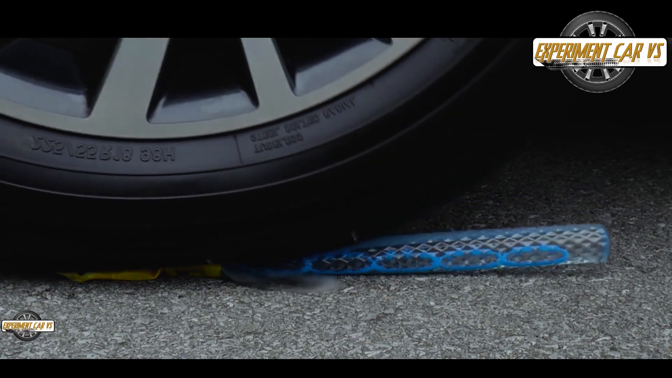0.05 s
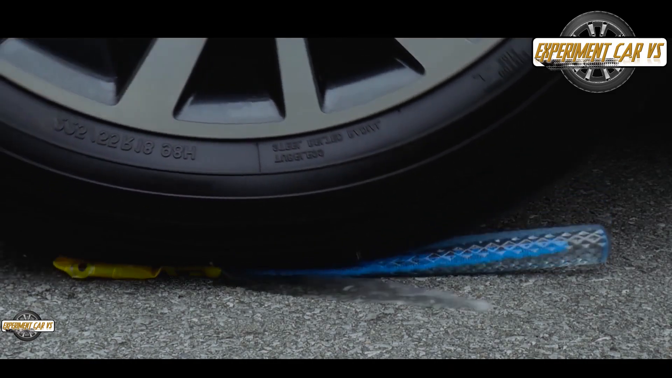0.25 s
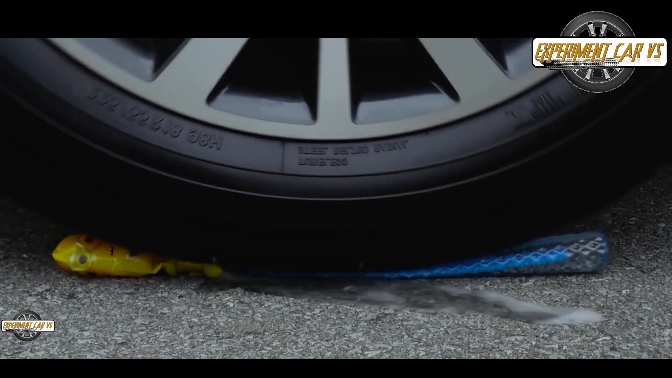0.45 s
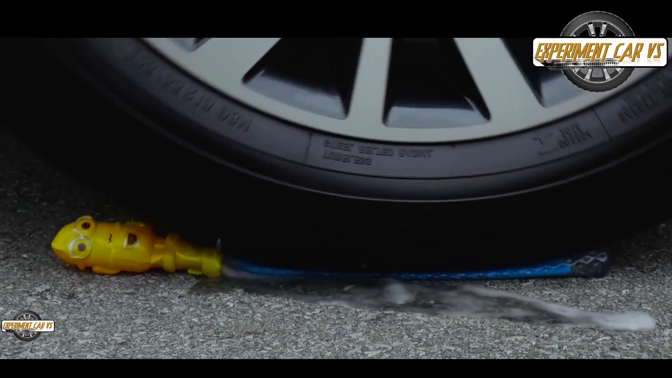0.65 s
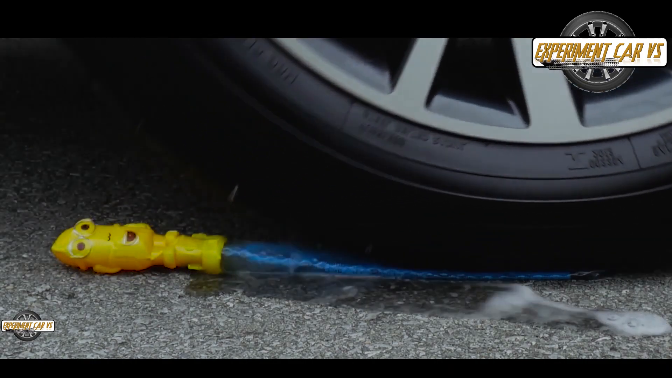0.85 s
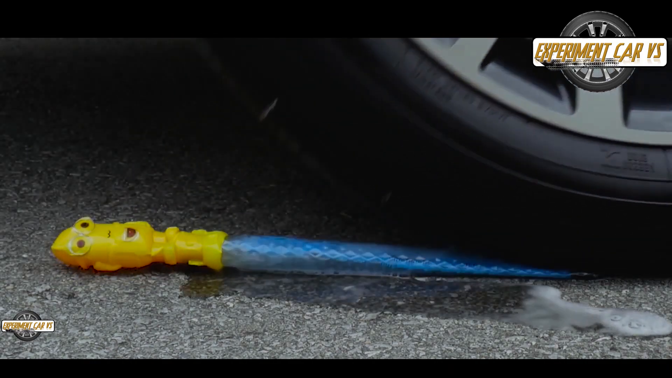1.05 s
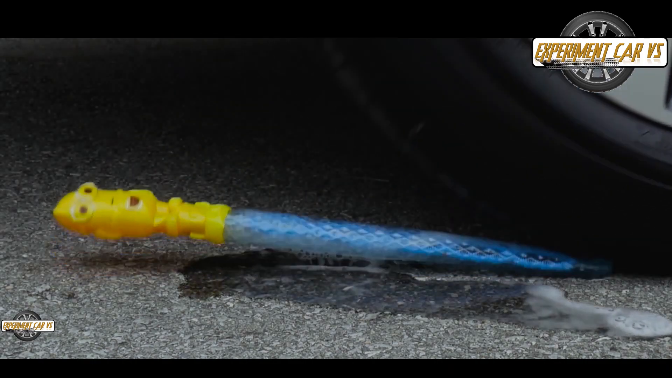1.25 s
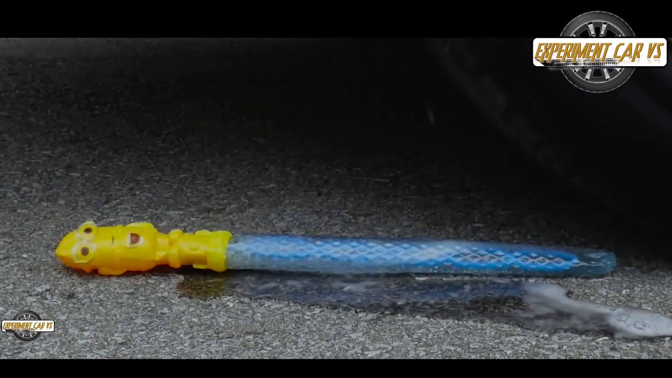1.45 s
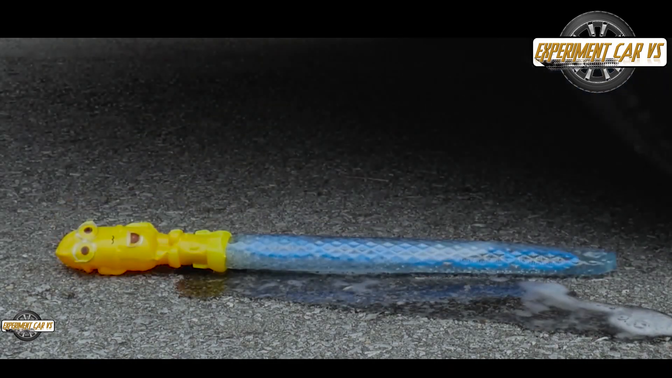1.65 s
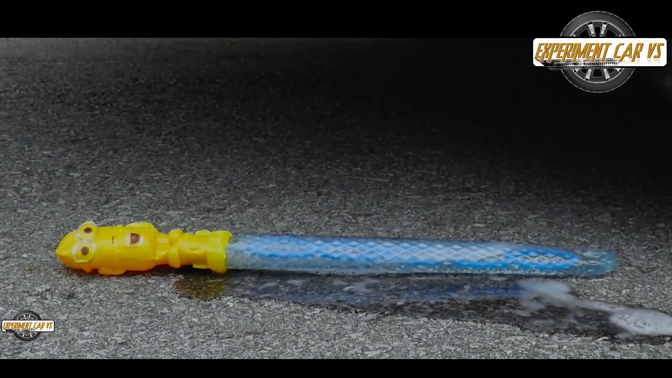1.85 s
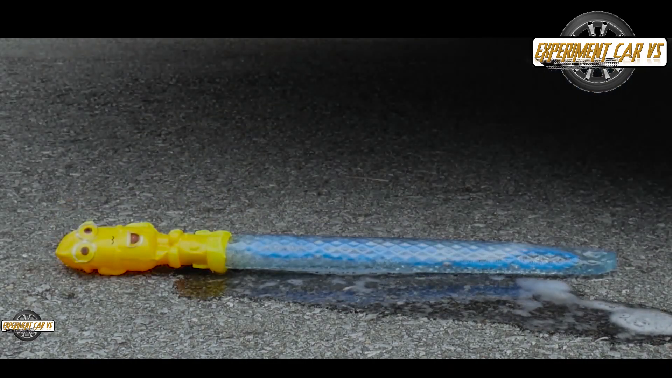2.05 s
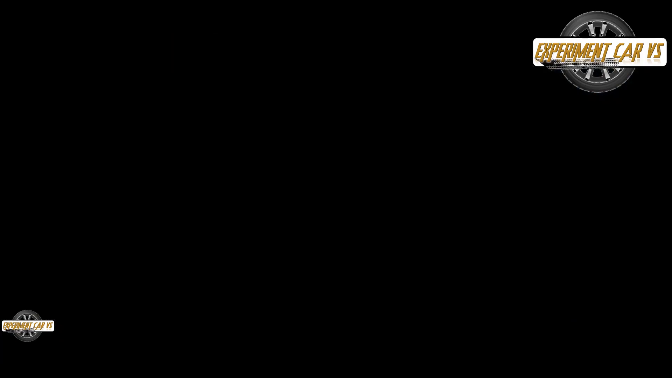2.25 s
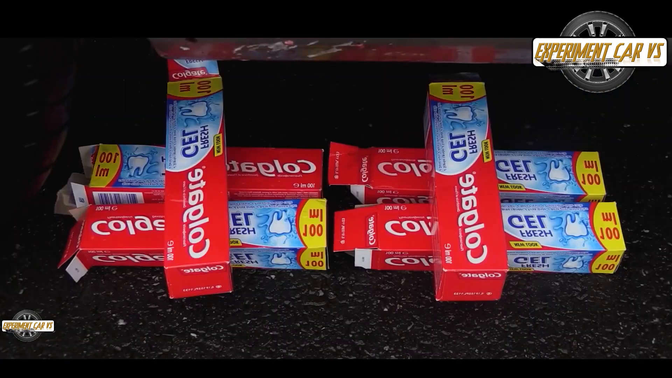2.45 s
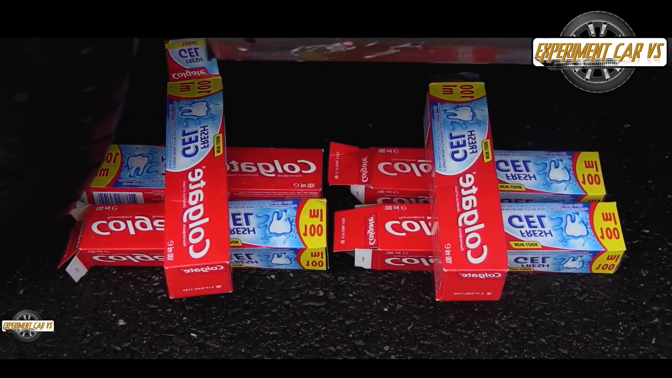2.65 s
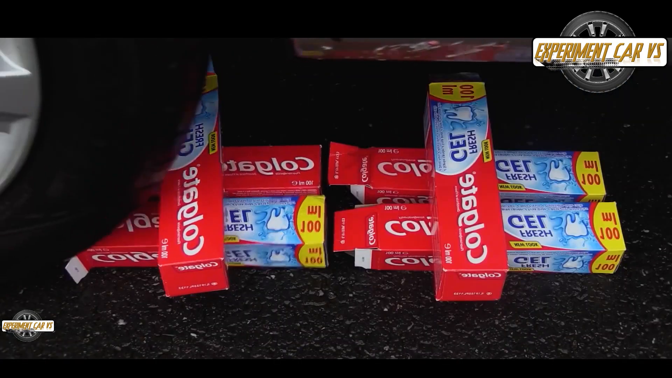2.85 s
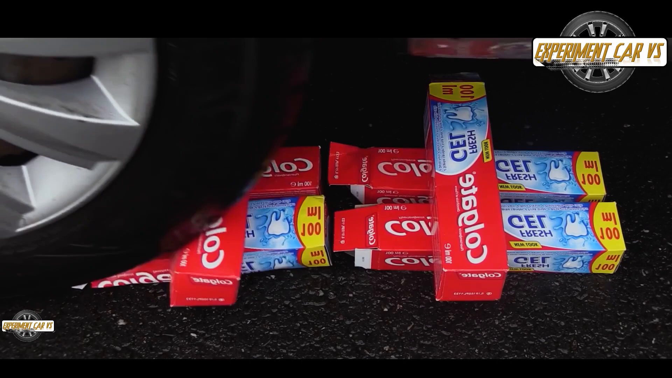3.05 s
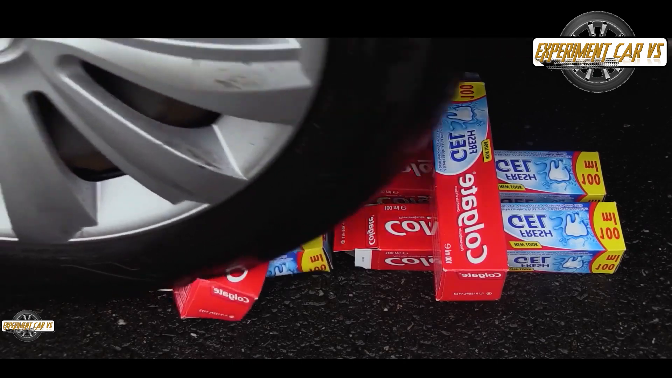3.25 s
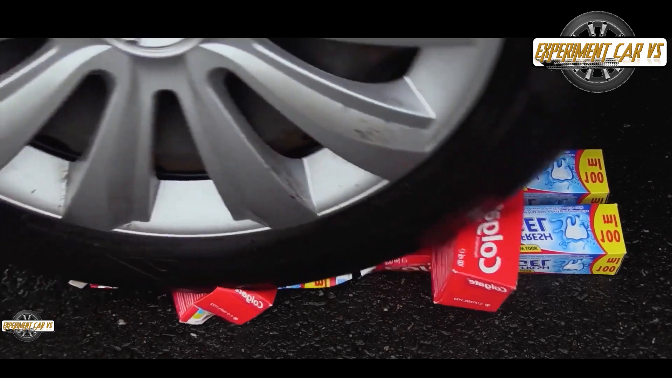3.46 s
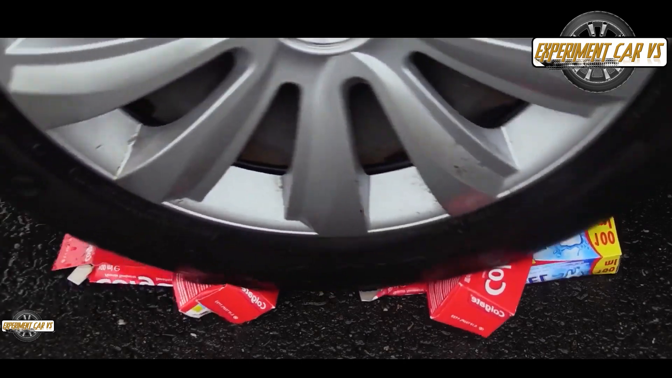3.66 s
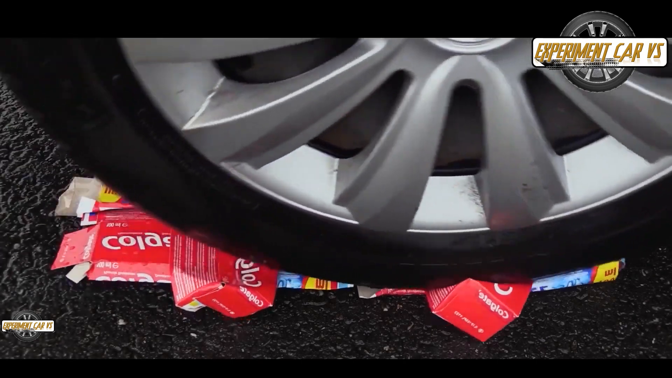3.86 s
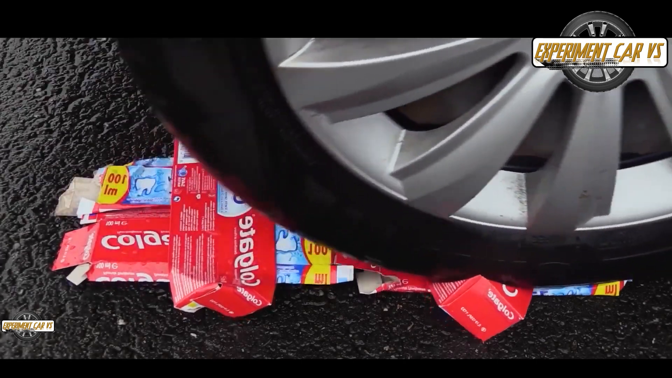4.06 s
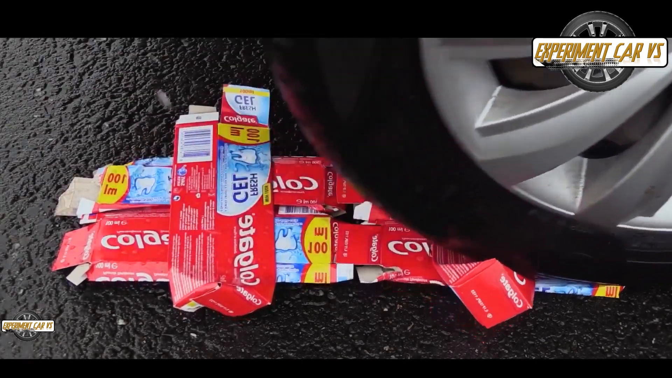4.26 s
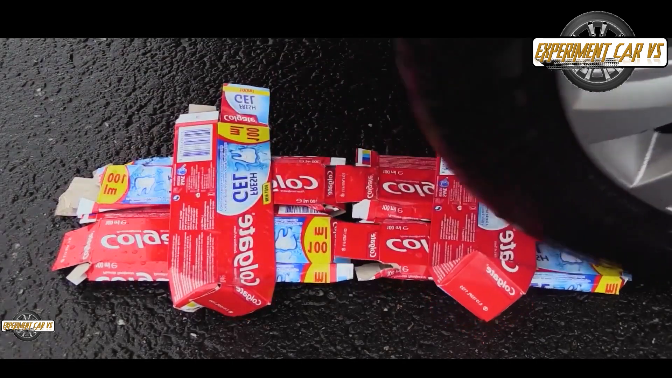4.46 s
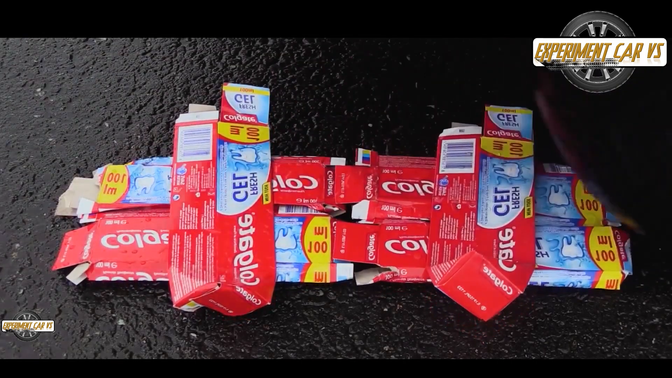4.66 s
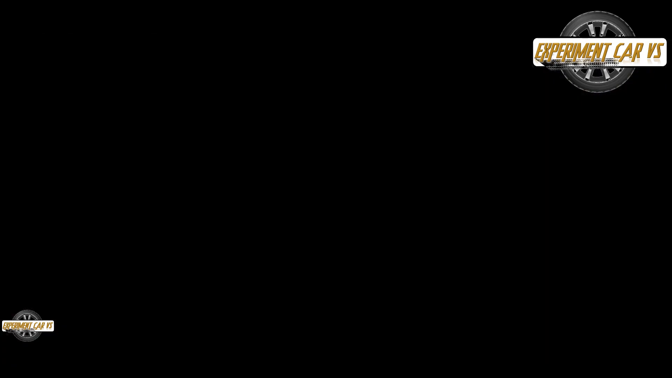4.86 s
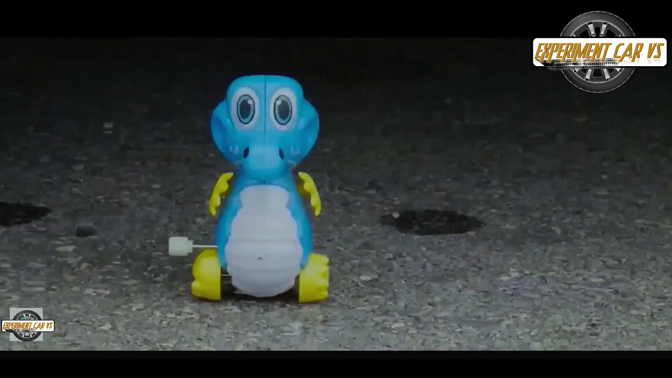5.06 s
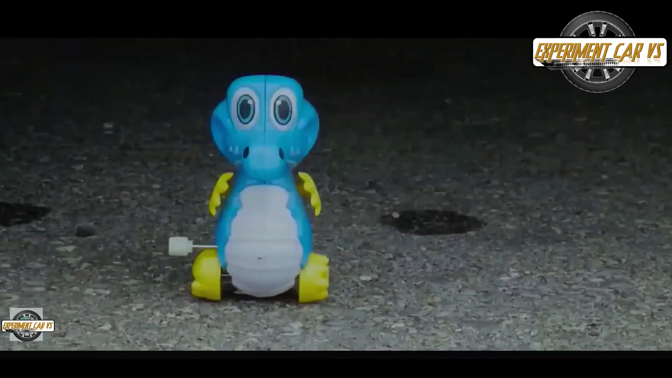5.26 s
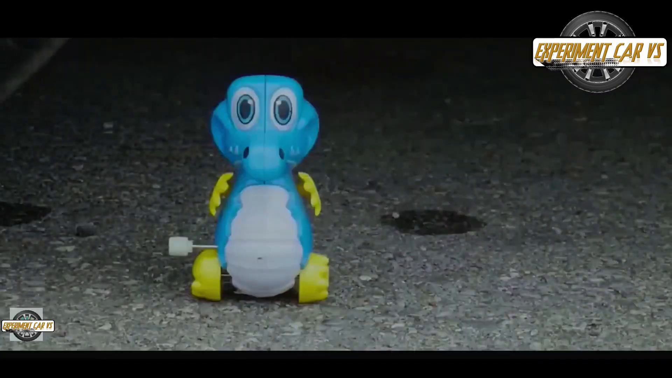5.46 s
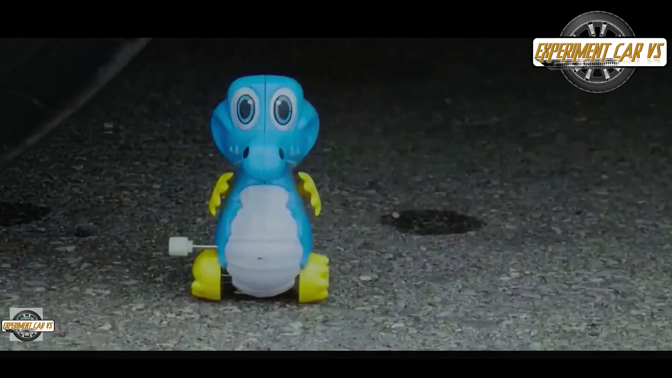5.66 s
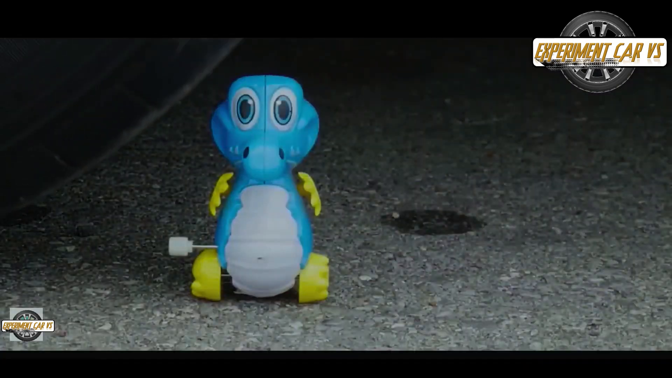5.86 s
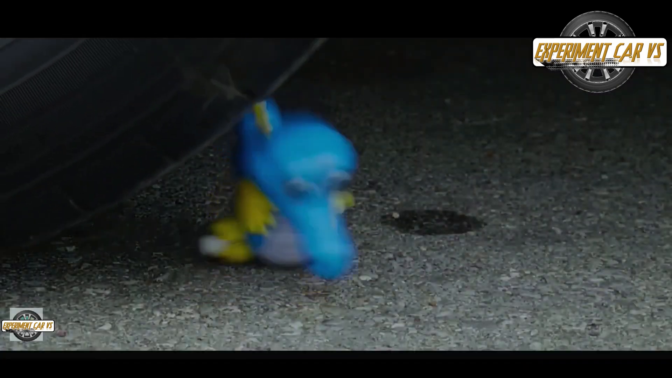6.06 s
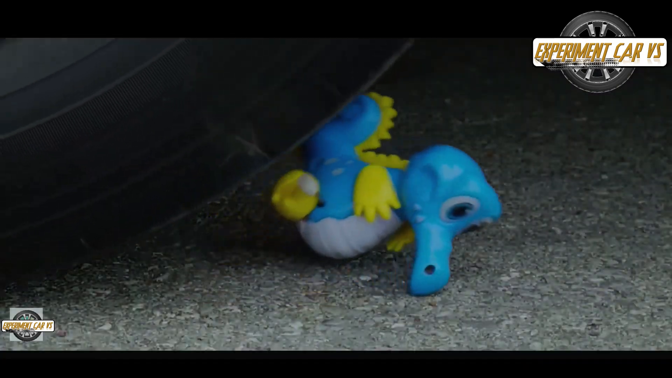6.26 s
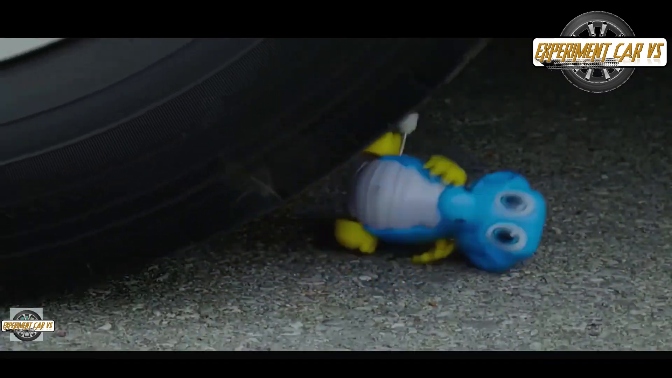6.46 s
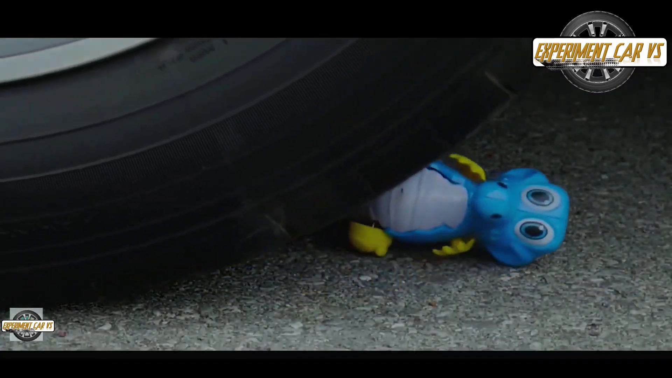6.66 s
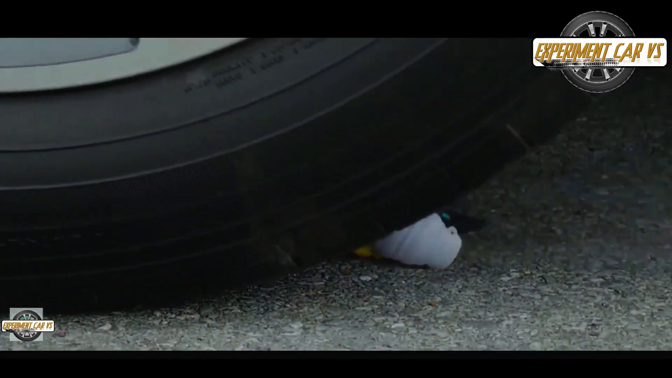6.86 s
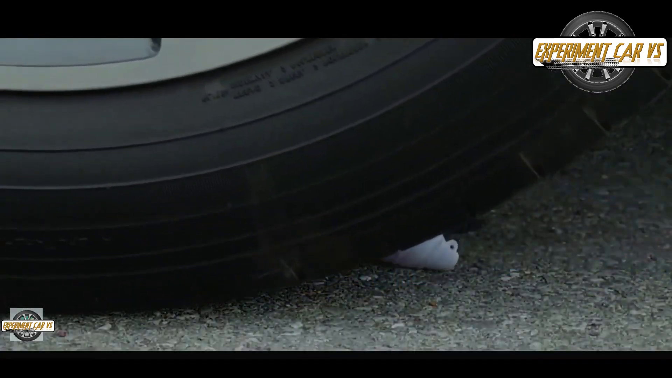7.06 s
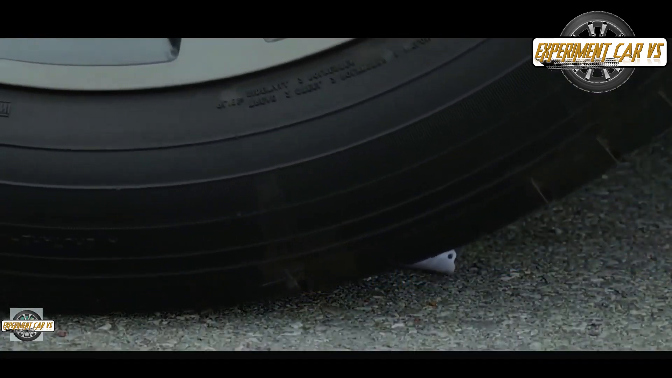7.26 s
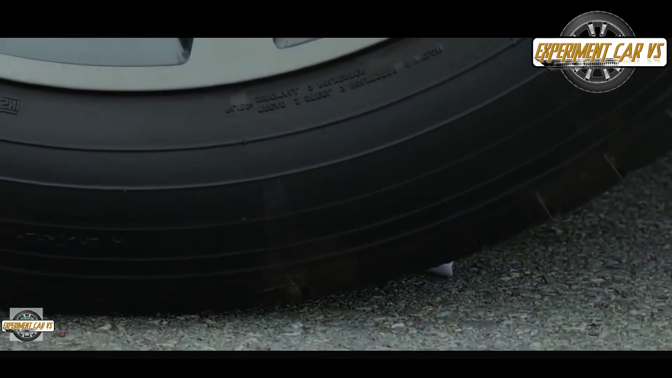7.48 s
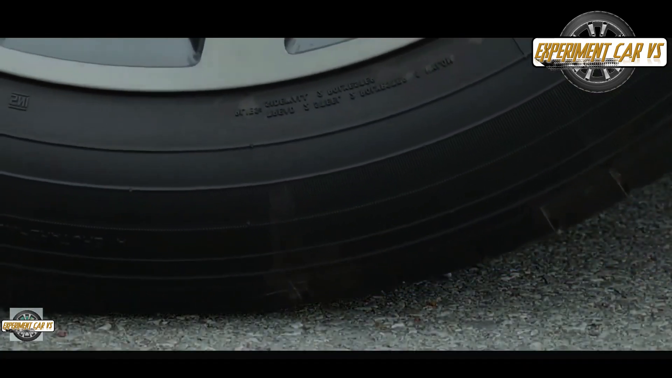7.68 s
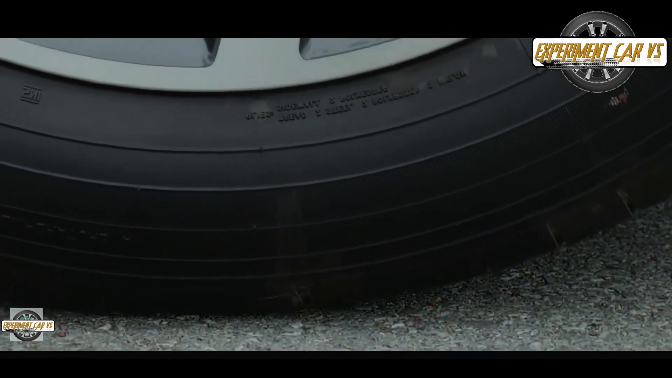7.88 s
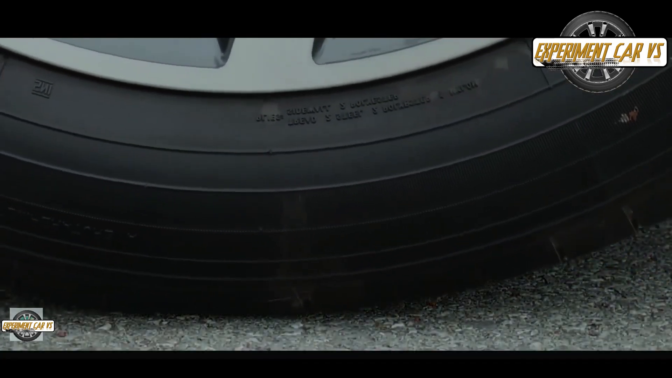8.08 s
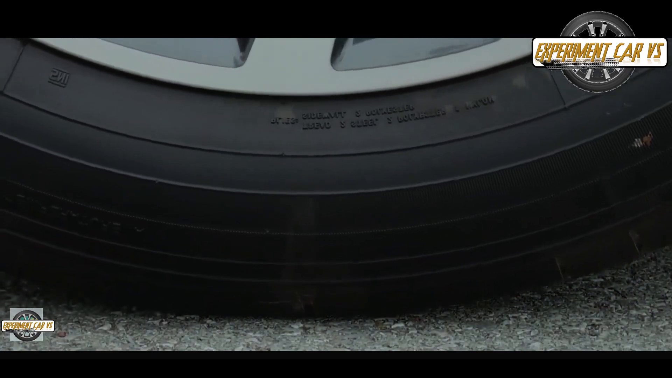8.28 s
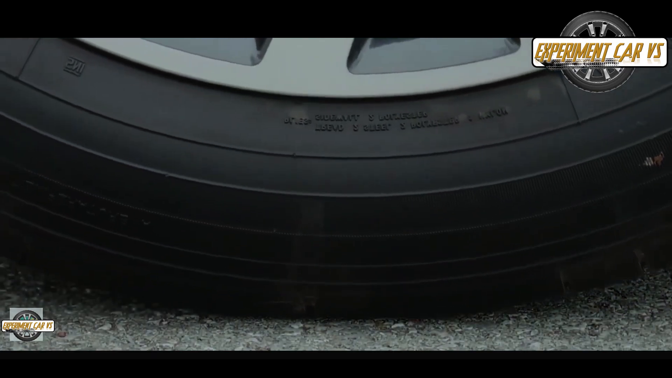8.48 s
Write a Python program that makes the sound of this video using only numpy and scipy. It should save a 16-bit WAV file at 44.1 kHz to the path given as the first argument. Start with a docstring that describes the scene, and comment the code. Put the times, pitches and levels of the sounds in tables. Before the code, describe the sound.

Hissing squirts and sharp plastic snaps, a brief silence, crunching squeaky card over engine clatter, another silence, then dense brittle cracks under a groaning tyre.

```python
"""A thin hiss and small ticks come first, then sharp cracks: a car tyre rolls slowly over a plastic tube of soap
water on asphalt, which squirts as it splits. After a short silence it crushes cardboard cartons beside an idling
engine, and after another a hard wind-up toy. Cracks are knocks, noise rasps and rings; hisses, rustles and groans
are shaped noise; squeaks, exhaust and the hum of the air in the tyre have tones. A far street lies under the tube
and the toy, both in the middle; the cartons and engine are in stereo, from two microphones."""
import sys
import numpy as np
from scipy import signal
from scipy.fft import rfft, irfft
from scipy.io import wavfile
from scipy.ndimage import uniform_filter1d

SR = 44100
rng = np.random.default_rng(int(sys.argv[2]) if len(sys.argv) > 2 else 0)


def log_audio(samples):
    """Write samples as a 16-bit WAV file to the path given in sys.argv[1]."""
    # one column per channel
    frames = np.atleast_2d(samples).T
    # limit to full scale, then quantise
    limited = np.clip(frames, -1, 1)
    pcm = np.round(limited * 32767).astype(np.int16)
    wavfile.write(sys.argv[1], SR, pcm)


N = 375732
T = np.arange(N) / SR  # time [s]

# The three crushings, tube, cartons, toy: (start [s], end [s])
PARTS = [(0, 2.2265), (2.409, 4.946), (5.128, 8.6)]


def amp(db):
    """Gain of a level in dB."""
    return 10 ** (np.asarray(db) / 20)


def evened(x):
    """Scales a signal to an rms of one."""
    return x / np.sqrt(np.mean(x ** 2) + 1e-20)


def smooth_noise(size):
    """Slow random motion: white noise averaged over size samples."""
    return uniform_filter1d(rng.standard_normal(N), size=size)


def read(points, hz):
    """Reads a table against frequency, in straight lines on a log scale."""
    f, value = np.transpose(points)
    return np.interp(np.log(hz + 1), np.log(f + 1), value)


def curve(rows, count=1):
    """Reads one level column against time as gain, silent outside the table."""
    rows = np.array(rows)
    return amp(np.interp(T, rows[:, 0], rows[:, count], -150, -150))


def held(rows, rise_s, fall_db_s):
    """Gain of spells (start [s], end [s], level [dB]) that rise, hold and die away; their powers add."""
    start, end, db = np.transpose(rows)[:, :, None]
    rise = np.clip((T - start) / rise_s, 0, 1) ** 2
    gain = rise * amp(db - fall_db_s * np.maximum(T - end, 0))
    return np.sqrt((gain ** 2).sum(0))


def colour(x, points, tilt_db=0):
    """Filters x to a spectrum; the tilt turns about 3 kHz, per factor of e in frequency."""
    hz = np.fft.rfftfreq(len(x), 1 / SR)
    tilt = tilt_db * np.log((hz + 300) / 3300)
    return evened(irfft(rfft(x) * amp(read(points, hz) + tilt), len(x)))


def resonate(x, hz, width):
    """A resonance whose pitch may move: shifts hz down to zero, smooths, and shifts back."""
    turn = np.exp(2j * np.pi * np.cumsum(hz * np.ones(len(x))) / SR)
    r = np.exp(-np.pi * width / SR)
    return 2 * (turn * signal.lfilter([1 - r], [1, -r], x / turn)).real


def grains(spread_db, ms):
    """Noise whose loudness jumps about within ms: many tiny snaps of unlike size."""
    jumps = evened(smooth_noise(max(int(ms * SR / 1000), 1)))
    return rng.standard_normal(N) * amp(spread_db * np.clip(jumps, -3, 3))


# Street at the first and last place, one spectrum each: (frequency [Hz], relative level [dB per Hz])
STREET_SPECTRA = [
    [(15, -39.5), (25, -13), (82, -4), (195, -8), (503, -5.5), (1370, -15.5), (4740, -21), (8360, -29.5),
     (14400, -27), (16000, -48.5)],
    [(15, -46), (25, -8), (161, -4), (309, -8), (560, -3), (695, 0), (1840, -11), (3160, -8), (4870, -17.5),
     (11000, -23), (14800, -38), (16000, -66)],
]
# Street noise when turned down, first and last place: (level [dB])
QUIET_LEVELS = [-58.5, -53]
# Louder spells, one list a place: (start [s], end [s], level [dB])
LOUDER = [
    [(-.15, 1.513, -46)],
    [(5.78, 6.7, -42.5), (6.95, 8.38, -45)],
]


def street():
    """Soft far street noise, turned up and down in fades."""
    out = np.zeros(N)
    for quiet_db, louder, spectrum, (start, end) in zip(QUIET_LEVELS, LOUDER, STREET_SPECTRA, PARTS[::2]):
        level = amp(quiet_db) + held(louder, rise_s=0.032, fall_db_s=208)
        out += (T >= start) * (T < end) * level * colour(grains(1.6, ms=29.0), spectrum)
    return out


# Engine running: (time [s], firings [per s], level of rumble [dB])
FIRING = [(2.4, 22, -26.5), (3.0, 24.3, -26), (3.3, 22.8, -26), (3.7, 23.8, -29), (4.95, 23.8, -28)]
# Rumble and clatter before tilt: (frequency [Hz], relative level [dB per Hz])
ENGINE_SPECTRUM = [(18, -54.5), (30, -58.5), (100, 2.5), (215, 2), (499, 3.5), (632, 5), (1100, -2),
                   (1500, -9), (2060, -9.5), (3490, -20), (4910, -29.5), (8520, -29), (14000, -43),
                   (16000, -90)]
# Exhaust tones: (multiple of the firing rate, level at 4.5 s [dB])
EXHAUST = [(3, -48), (4, -40), (5, -40)]
# Tappet tick, once in four firings: (time of one tick [s], pitch [Hz], width [Hz], level [dB])
TAPPET = (4.2405, 2100, 130, -17)


def engine():
    """Exhaust tones, a rumble, clatter that swells at every firing, and a ringing tappet tick."""
    tick_s, tick_hz, tick_width, tick_db = TAPPET
    turns = np.cumsum(np.interp(T, *np.transpose(FIRING)[:2])) / SR  # counted in firings
    turns = turns - turns[round(tick_s * SR)]
    tones = sum(amp(db) * np.sin(2 * np.pi * (k * turns + rng.random())) for k, db in EXHAUST)
    tones = tones * amp(-2.5 * (T - 4.5))  # the exhaust note fades as the car rolls on

    late = turns - .15 + 0.13 * evened(smooth_noise(3000))  # uneven timing
    strengths = amp(8.1 * np.clip(rng.standard_normal(200), -1.5, 1.5))
    strength = strengths[np.floor(late).astype(int) % 200]
    burst = strength * np.sin(np.pi * (late % 1) ** 0.49) ** 2
    rumble = colour(rng.standard_normal(N), ENGINE_SPECTRUM, -0.53) * (1 + 0.21 * burst)
    clatter = colour(grains(3.4, ms=6.4), ENGINE_SPECTRUM, 2.85) * (0.68 + burst)
    clatter = clatter + 0.9 * resonate(clatter, 3500, 350)  # a cover rings with the clatter

    strikes = np.diff(np.floor(turns / 4), prepend=0) * SR / (2 * np.pi * tick_width)
    tick = resonate(resonate(strikes, tick_hz, tick_width), tick_hz, 400)
    tick = tick * np.clip(T - 3, 0, 1)  # plainer once the car has drawn level
    return tones + curve(FIRING, count=2) * (rumble + 0.5 * clatter) + amp(tick_db) * tick


# Spells of humming air in the tyre: (start [s], end [s], level of the steady tone [dB])
HUM = [(-.05, .2, -41.5), (5.9, 6.0, -42), (6.76, 7.12, -37.5), (7.49, 7.6, -43)]


def tyre_hum():
    """The ring of air in the tyre is set humming, then dies away: a steady tone and a narrow noise."""
    hum_hz = 192.3
    tone = np.sin(2 * np.pi * hum_hz * T)
    waver = evened(resonate(rng.standard_normal(N), hum_hz, 9.3))
    return held(HUM, rise_s=0.008, fall_db_s=33.5) * (tone + 0.43 * waver)


# The tyre wall groans over the toy: (start [s], end [s], level of the lower resonance [dB])
GROANS = [(5.82, 5.98, -45), (6.475, 6.79, -38), (6.9, 7.0, -41), (7.48, 7.54, -40)]


def groan():
    """Lumpy noise in two low resonances of the tyre wall that wander as it bends."""
    bend = 1 + 0.043 * evened(smooth_noise(2500))
    rub = grains(2.0, ms=33.0)
    wall = evened(resonate(resonate(rub, 120 * bend, 40), 120 * bend, 70))
    wall += 0.61 * evened(resonate(resonate(rub, 230 * bend, 50), 230 * bend, 90))
    return held(GROANS, rise_s=0.0074, fall_db_s=340) * wall


# Small dry splinters: (time [s], peak level [dB], pitch [Hz])
TICKS = [(0.019, -15.5, 3620), (0.0857, -14, 3280), (0.1205, -15, 2980), (.128, -19, 2700),
         (0.134, -18, 3400), (0.213, -12, 9000), (.813, -3, 5500), (3.133, -3.5, 7700), (4.185, -9, 2000),
         (4.509, -14.5, 1800), (6.4066, -15, 1400), (6.422, -13, 1390), (6.6198, -10, 6000),
         (6.7566, -10, 6900), (7.008, -9, 6400), (7.014, -11, 6400), (7.093, -14, 6500), (8.022, -14, 7300),
         (8.2004, -23, 2320), (8.2312, -28, 1510), (8.285, -27, 2300), (8.3085, -33, 1800),
         (8.396, -38, 2600), (8.42, -34, 2300)]


def ticks():
    """Each splinter is a few milliseconds of noise with a broad peak and no ring."""
    out, t = np.zeros(N), T[:512]
    for s, db, hz in TICKS:
        snap = rng.standard_normal(len(t)) * np.minimum(t / 0.00044, 1) * amp(-60 * t / .009)
        sound = resonate(resonate(snap, hz, .5 * hz), hz, hz)
        out[round(s * SR):][:len(t)] += amp(db) * sound / abs(sound).max()
    return out


# Card folds over with a rustle: (start [s], length [s], level [dB])
FOLDS = [(2.93, 0.014, -34), (3.016, 0.15, -27), (3.093, 0.033, -18), (3.138, 0.066, -26.5),
         (3.212, 0.029, -25.5), (3.318, 0.022, -19), (3.409, 0.19, -27), (3.611, 0.013, -14.5),
         (3.656, 0.012, -24), (3.686, 0.24, -37), (3.943, 0.025, -22), (3.986, 0.13, -33.5),
         (4.093, 0.035, -29), (4.147, 0.055, -23), (4.449, 0.026, -30.5), (4.524, 0.047, -27.5)]


def rustle():
    """Gain of the folding card, which sets both the rustle and its pops."""
    return held([(s, s + length, db) for s, length, db in FOLDS], rise_s=0.011, fall_db_s=499)


def pops(folding):
    """Small folds give way at random under the rustle, each ringing a panel of its own size."""
    clicks = (rng.random(N) < 450 / SR) * amp(2.4 * rng.standard_normal(N))  # about 450 a second
    last_click = np.maximum.accumulate(np.arange(N) * (clicks > 0))
    panel_hz = 1300 * 2 ** np.clip(rng.standard_normal(N), -1.3, 1.6)[last_click]
    return folding * amp(-9.5) * evened(resonate(resonate(clicks, panel_hz, 130), panel_hz, 600))


# A flap slips in steps: (start [s], end [s], slips [per s], level [dB])
CREAKS = [(3.5015, 3.575, 118, -13), (4.159, 4.207, 170, -17)]


def creaks():
    """Slow stick and slip, heard one slip at a time as short bursts of card noise."""
    slips = sum(amp(db - 60 * ((T - start) % (1 / rate)) / 0.005) * (T > start) * (T < end)
                for start, end, rate, db in CREAKS)
    return slips * colour(rng.standard_normal(N), CARTON_SPECTRUM, 4.3)


# Squeaks of card on card, one list a squeak: (time [s], level [dB], pitch [Hz])
SQUEAKS = [
    [(3.05, -29, 4720), (3.059, -19, 4420)],
    [(3.063, -24, 1730), (3.084, -29, 1900)],
    [(3.092, -22.5, 4300), (3.105, -19.5, 4950)],
    [(3.335, -18, 660), (3.35, -21.5, 690)],
    [(3.416, -11.5, 531), (3.433, -10, 552), (3.439, -6.5, 609), (3.468, -12.5, 607), (3.476, -26.5, 588),
     (3.512, -24, 625)],
    [(3.553, -22, 962), (3.585, -16, 727)],
    [(3.587, -7, 652), (3.604, -26, 620)],
]
# Harmonics of a squeak: (multiple of the pitch, relative level [dB])
SQUEAK_HARMONICS = [(1, 5), (2, -3.5), (3, -3), (5, -12.5), (11, -18.5)]


def squeaks():
    """Fast stick and slip gives a buzzing note of harmonics, unsteady in pitch and level."""
    out = np.zeros(N)
    for rows in SQUEAKS:
        s, db, hz = np.transpose(rows)
        turns = np.cumsum(np.interp(T, s, hz) * (1 + 0.3 * smooth_noise(60))) / SR
        note = sum(amp(d) * np.sin(2 * np.pi * (k * turns + rng.random()))
                   for k, d in SQUEAK_HARMONICS if k * hz[0] < 7500)
        edges = np.clip(np.minimum(T - s[0], s[-1] - T) / 0.0044, 0, 1)
        uneven = amp(2.15 * evened(smooth_noise(120)))
        out += curve(rows) * edges * uneven * evened(note)
    return out


# Two spurts through the split, one list a spurt: (time [s], level of hiss [dB], jet pitch [Hz])
SQUIRT = [
    [(0, -35.5, 5530), (.06, -38.5, 4580), (.2, -37.5, 5510), (.3, -33.5, 9500), (.4, -28, 9680),
     (.78, -30.5, 10000), (.86, -29.5, 4520), (.98, -60, 3780)],
    [(.985, -42, 4450), (.995, -32.5, 4500), (1.09, -32.5, 4270), (1.12, -39.5, 4040), (1.34, -46, 4000),
     (1.6, -72, 3900)],
]
# For each spurt: (first jet width [Hz], share of jet tone, tilt of the hiss [dB per factor of e])
JETS = [(3500, .4, 8), (800, 1, 5.5)]


def squirt():
    """Soap water and air forced through a split: a wide hiss, a jet tone that moves, a low gurgle."""
    spray, sputter = grains(2.9, ms=1.4), grains(3.5, ms=10.0)
    jet_hz = np.interp(T, *np.concatenate(SQUIRT).T[[0, 2]])
    gurgle = evened(resonate(resonate(grains(4.5, ms=16.0), 760, 480), 640, 670))
    out = np.zeros(N)
    for rows, (width, share, tilt_db) in zip(SQUIRT, JETS):
        hiss = colour(spray, TUBE_SPECTRUM, tilt_db)
        jet = evened(resonate(resonate(sputter, jet_hz, width), jet_hz, 2300))
        out += curve(rows) * (hiss + share * jet + amp(-9) * gurgle)  # the gurgle follows the hiss
    return out


# Tread and ground under a crack: (frequency [Hz], relative level [dB per Hz])
THUMP_SPECTRUM = [(45, -36), (100, -3.5), (250, 3), (600, 6), (1100, -16.5)]


def cracks(rows, body, ring_db, ring_q, spike, bright_db, rise, tail_db, tail_t60, knock_db):
    """Each crack is a knock and a dying rasp; a piece rings, the tyre thumps, the gap under the car echoes."""
    out, t = np.zeros(N + 8192), np.arange(8192) / SR
    for s, db, hz, thump_db, t60 in rows:
        a, b, c = rng.standard_normal((3, len(t)))
        fall_db = -60 * t / np.clip(t60, .008, .3)
        force = np.minimum(t / (rise * t60), 1) * (amp(fall_db) + spike * amp(1.7 * fall_db))

        shape = b[-160:] * amp(-60 * t[:160] / 0.0044)  # each piece has its own peaks
        rough = a * amp(2.85 * evened(uniform_filter1d(c, size=40)))
        rasp = signal.fftconvolve(rough, shape, "same")
        rasp = colour(rasp, body, bright_db * np.log(hz / 2500)) * force  # small pieces ring high and rasp bright

        strike = b * force + 35 * (t == 0)
        ring = resonate(resonate(strike, hz, hz / ring_q + 50), hz, 0.85 * hz)
        cycles = hz * t[:1024]
        knock = -np.sin(2 * np.pi * cycles) * np.minimum(cycles / 0.74, 1) * np.exp(-2.0 * cycles)
        thump = colour(c, THUMP_SPECTRUM) * np.minimum(t / 0.00018, 1) * amp(0.9 * fall_db)

        sound = rasp / abs(rasp).max() + amp(ring_db) * ring / abs(ring).max()
        sound[:1024] += amp(knock_db) * knock / abs(knock).max()
        sound = sound / abs(sound).max() + amp(thump_db) * thump / abs(thump).max()
        out[round(s * SR):][:len(t)] += amp(db) * sound
    out = signal.sosfilt(signal.butter(4, 65, "high", fs=SR, output="sos"), out)
    tail = rng.standard_normal(len(t)) * amp(-60 * t / tail_t60) * np.minimum(t / 0.012, 1)
    echo = signal.oaconvolve(out, tail / np.linalg.norm(tail))[:N]
    return out[:N] + amp(tail_db) * echo


# Cracks of the tube: (time [s], level [dB], ring pitch [Hz], thump re level [dB], fall by 60 dB [s])
# The fall is kept within 0.008 and 0.3 s; the cartons and the toy have the same columns.
TUBE_CRACKS = [(0.1987, -22, 10000, -31, 0.014), (0.2105, -10.5, 9100, -34, 0.015),
               (0.2174, -12.5, 9200, -36, 0.069), (0.268, -15.5, 9600, -22.5, 0.028),
               (0.4722, -0.5, 1910, -24, 0.022), (0.6745, -2, 9800, -48, 0.021),
               (0.6839, -5, 4360, -35.5, 0.028), (0.7249, -14.5, 9800, -17.5, 0.02),
               (0.7802, -10, 6600, -22, 0.43), (0.8051, -2, 10250, -18.5, 0.16),
               (0.809, -8, 5170, -32, 0.014), (0.8263, -1.5, 4500, -31, 0.015),
               (0.8452, -12.5, 1540, -29, 0.053), (0.8741, -13.5, 3100, -15.5, 0.27),
               (0.9017, -8.5, 2500, -33, 0.011), (1.4005, -11.5, 2600, -8, 0.045),
               (1.4091, -10.5, 3720, -10.5, 0.024), (1.4578, -6, 2550, -4, 0.031),
               (1.462, -14, 720, -11.5, 0.13), (1.4905, -26, 3600, -2, 0.041)]
# The tube as it breaks, before tilt: (frequency [Hz], relative level [dB per Hz])
TUBE_SPECTRUM = [(120, -42.5), (200, -2), (763, 8), (2090, 4), (6280, -1), (7970, -5.5), (11300, -6.5),
                 (14100, -23), (16000, -32)]


def tube():
    """Thin plastic splits with sharp cracks and squirts its soap water."""
    breaking = cracks(TUBE_CRACKS, TUBE_SPECTRUM, ring_db=0.5, ring_q=3.5, spike=0.5, bright_db=5.6,
                      rise=0.011, tail_db=-13.5, tail_t60=0.071, knock_db=0.54)
    return breaking + squirt()


# Cracks of the cartons: (time [s], level [dB], ring pitch [Hz], thump re level [dB], fall by 60 dB [s])
CARTON_CRACKS = [(2.9824, -9, 830, -22, 0.11), (3.0568, -13, 820, -18, 0.07), (3.1143, -3, 2750, -3, 0.024),
                 (3.1245, -7, 2120, -20, 0.021), (3.1509, -6, 1790, -4.5, 0.11),
                 (3.1648, -5.5, 1770, -2.5, 0.037), (3.2069, -1, 710, -28, 0.007),
                 (3.2274, -9.5, 473, -2, 0.13), (3.3649, -1.5, 800, -25.5, 0.11),
                 (3.3856, -7, 940, -11, 0.097), (3.4983, -15.5, 640, 5.5, 0.21),
                 (3.5588, -12.5, 880, 1, 0.08), (3.5966, -4, 775, -13, 0.25),
                 (3.6087, -2, 563, -25.5, 0.091), (3.6285, -4, 2170, -10, 0.1),
                 (3.6758, -6, 3260, -30, 0.017), (3.6854, -5, 720, -46, 0.14),
                 (3.7605, -13, 725, -13, 0.061), (3.7815, -11.5, 743, -15, 0.059),
                 (3.834, 0, 580, -41, 0.026), (3.8426, -12, 1080, -33, 0.02), (3.8972, -1, 624, -32, 0.076),
                 (3.9384, -10, 830, -20, 0.17), (4.1, -12, 2610, -31, 0.2),
                 (4.169, -10.5, 2730, -14.5, 0.13), (4.1966, -11.5, 1790, -37, 0.083)]
# Card as it breaks, before tilt: (frequency [Hz], relative level [dB per Hz])
CARTON_SPECTRUM = [(59, -39.5), (100, -11), (283, -14.5), (801, 14.5), (1480, 5.5), (2170, 7.5),
                   (6150, -14), (10000, -19.5), (14700, -30), (16000, -73.5)]


def cartons():
    """Card cracks, squeaks and creaks as it rubs, and folds over with rustles and pops."""
    breaking = cracks(CARTON_CRACKS, CARTON_SPECTRUM, ring_db=4.5, ring_q=4.5, spike=0.79, bright_db=6.3,
                      rise=0.021, tail_db=-15.5, tail_t60=0.11, knock_db=-4.5)
    folding = rustle()
    rustling = folding * colour(grains(3.2, ms=1.4), CARTON_SPECTRUM, 6.4)
    return breaking + squeaks() + creaks() + pops(folding) + rustling


# Cracks of the toy: (time [s], level [dB], ring pitch [Hz], thump re level [dB], fall by 60 dB [s])
TOY_CRACKS = [(5.8546, -23, 1320, -11, 0.15), (5.8849, -16, 1460, -13, 0.071),
              (5.9024, 2, 10000, -18, 0.042), (5.9121, -4, 9700, -29, 0.1), (5.9226, 0.5, 10300, -39, 0.13),
              (5.9403, -0.5, 7140, -14.5, 0.031), (5.947, -1, 1420, -40, 0.043),
              (5.9654, -2.5, 4040, -40, 0.06), (6.0122, -13, 3170, -36, 0.078),
              (6.0203, -11.5, 1450, -46, 0.058), (6.0442, -15, 3570, -43, 0.19),
              (6.0843, -16.5, 3630, -49, 0.15), (6.2828, 1.5, 1410, -44, 0.02),
              (6.3297, -12.5, 3500, -35, 0.11), (6.3517, -6.5, 1430, -45, 0.18),
              (6.3788, -9, 1360, -39, 0.079), (6.4817, 2.5, 3840, -13, 0.053),
              (6.507, -8, 1390, -14, 0.075), (6.5271, -8, 3200, -11, 0.011),
              (6.5605, 0.5, 8900, -20, 0.027), (6.5701, 1, 4430, -15.5, 0.056),
              (6.5775, -8.5, 8000, -3.5, 0.03), (6.5879, -5, 3370, -22, 0.066),
              (6.5975, -1.5, 4400, -30, 0.046), (6.6105, -6.5, 3800, -18, 0.02),
              (6.6345, -1, 7140, -16, 0.038), (6.6978, -5.5, 6570, -32, 0.029),
              (6.725, 3.5, 4450, -23, 0.057), (6.7333, 4, 7000, -22, 0.038),
              (6.8813, -9.5, 6400, -7, 0.012), (6.9088, -3.5, 6430, -14, 0.014),
              (6.9214, -3, 4800, -3.5, 0.022), (6.9275, -11.5, 4540, -6, 0.082),
              (6.9679, -7, 5030, -24, 0.079), (7.0206, -6, 4300, -33, 0.08),
              (7.0355, -2.5, 6030, -14, 0.017), (7.0977, -8.5, 3680, -31, 0.077),
              (7.1471, -7.5, 4120, -40, 0.031), (7.182, -8, 6000, -23, 0.14),
              (7.1877, -4, 3960, -22, 0.057), (7.1997, -1, 8200, -3.5, 0.0053),
              (7.3169, -9, 5930, -18, 0.078), (7.437, -0.5, 920, -6, 0.011), (7.4856, 4, 940, -4, 0.023),
              (7.5195, -9.5, 4450, -12, 0.078), (7.5958, -14, 3740, -20, 0.041),
              (7.6568, -12.5, 3450, -43, 0.14), (7.6645, -12, 3640, -42, 0.035),
              (7.784, -11, 3770, -39, 0.068), (7.8439, -19.5, 4020, -29, 0.16),
              (7.8743, -17, 7100, -37, 0.082), (7.8969, -20.5, 1680, -29, 0.26),
              (7.9363, -16, 4200, -22, 0.15), (7.9994, -2, 1030, -14.5, 0.05),
              (8.0345, -2.5, 7160, -13.5, 0.0047), (8.1181, -0.5, 10000, -21, 0.0033),
              (8.1515, -18, 4300, -21, 0.059), (8.3223, 0, 2440, -14, 0.015)]
# The toy as it breaks, before tilt: (frequency [Hz], relative level [dB per Hz])
TOY_SPECTRUM = [(180, -2), (300, -62), (787, -0.5), (1060, 2.5), (1320, 4), (2480, -1.5), (3950, 7.5),
                (5430, -0.5), (7200, 5), (12700, -2.5), (16000, -35)]


def toy():
    """Hard plastic breaks piece by piece while the tyre wall groans over it."""
    breaking = cracks(TOY_CRACKS, TOY_SPECTRUM, ring_db=-1.6, ring_q=4.5, spike=1.27, bright_db=0.29,
                      rise=0.019, tail_db=-13.5, tail_t60=0.093, knock_db=-4.5)
    return breaking + groan()


# Likeness of the two microphones, raised to the power far: (frequency [Hz], share of power in common)
SAME = [(60, .96), (290, .93), (640, .84), (1250, .33), (2800, .82), (5000, .4), (15000, .7)]
# Balance of the two microphones: (frequency [Hz], left minus right before each source's offset [dB])
SIDES = [(60, 6), (180, 0), (550, 3.5), (1650, 4.5), (4970, 1.5), (15000, 1)]


def spread(x, left_db, lead_s, far):
    """Two microphones share the direct sound and differ in the scattered part; the top treble is rolled off."""
    hz, t = np.fft.rfftfreq(N, 1 / SR), np.arange(4000) / SR
    scatter = rng.standard_normal(len(t)) * amp(-60 * t / .15)
    scatter = rfft(scatter / np.linalg.norm(scatter), N)
    same, side = read(SAME, hz) ** far, np.array([[1], [-1]])  # more scatter for what is far; left, right
    pair = np.sqrt(1 + same) + side * np.sqrt(1 - same) * scatter
    balance = amp(side * (read(SIDES, hz) + left_db) / 2)
    pair = pair * balance / np.sqrt(2 + 2 * (hz / 11800) ** 16)
    lead = np.exp(1j * np.pi * side * hz * lead_s)  # the left microphone hears it lead_s earlier
    return irfft(rfft(x) * pair * lead, N)


def scene():
    """Tube and toy lie in the middle over the street; cartons and engine spread left and right."""
    splinters = ticks()
    middle = tube() + toy() + splinters + street() + tyre_hum()
    pair = spread(cartons() + splinters, left_db=-1.5, lead_s=0, far=.28)
    pair = pair + spread(engine(), left_db=2.4, lead_s=0.00036, far=1.1)
    near_engine = (T > PARTS[0][1]) * (T < PARTS[2][0])
    return np.where(near_engine, pair, middle)


def record(dry):
    """Overload on the loudest cracks, hard cuts between the parts, then the band limit."""
    ceiling, edge_hz = .64, 15700  # the microphone overloads softly under the toy
    loud = np.where(T > PARTS[2][0], ceiling * np.tanh(dry / ceiling), np.clip(dry, -.93, .93))
    loud = loud * sum((T >= start) * (T < end) for start, end in PARTS)
    band = signal.firwin(511, edge_hz, window=("kaiser", 9), fs=SR)
    return signal.oaconvolve(loud, band[None], "same")


dry = scene()
out = record(dry)
log_audio(out)
```